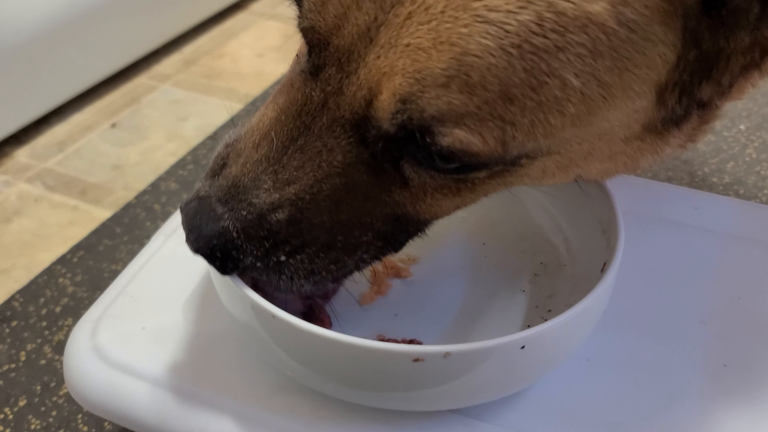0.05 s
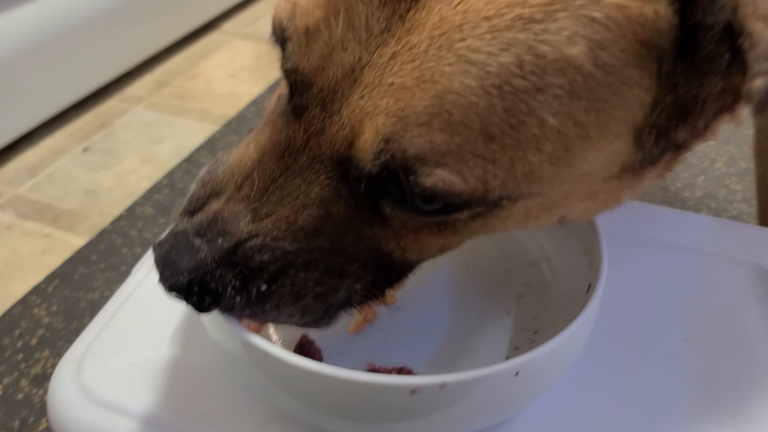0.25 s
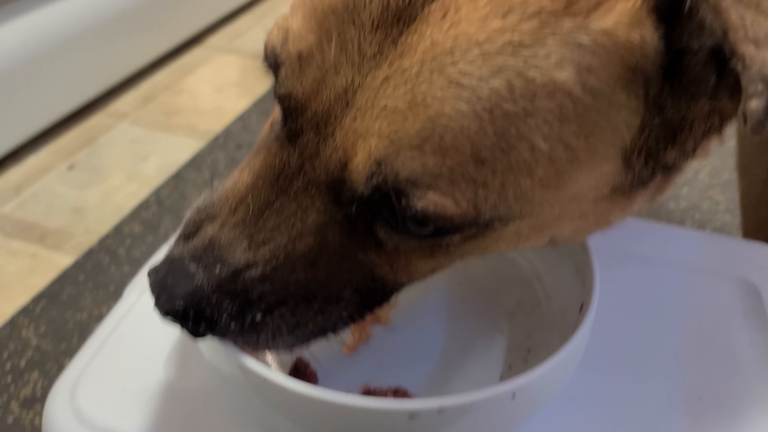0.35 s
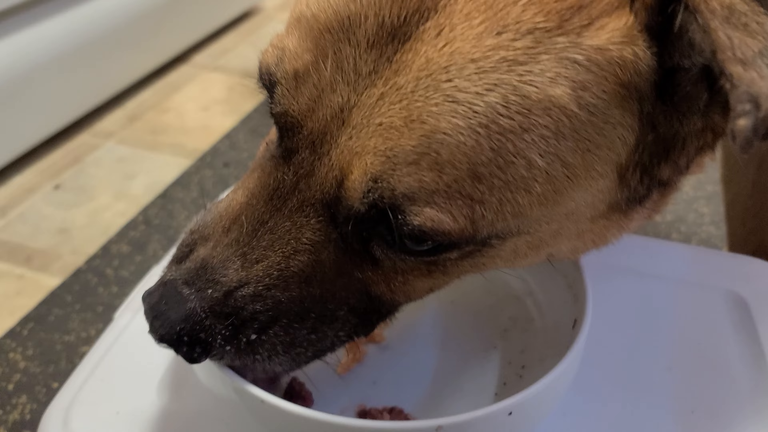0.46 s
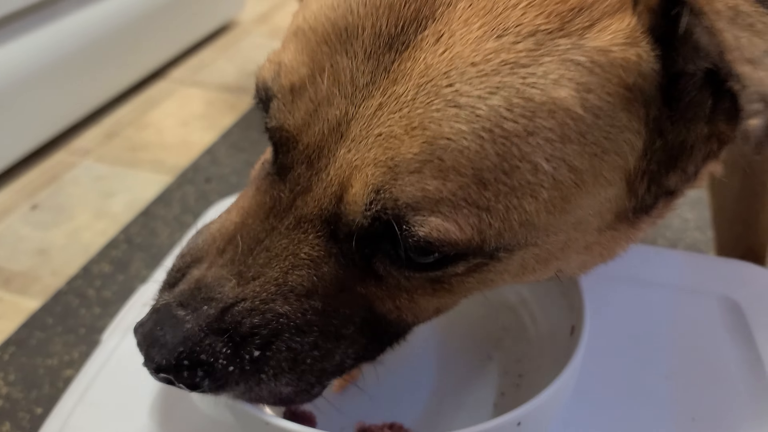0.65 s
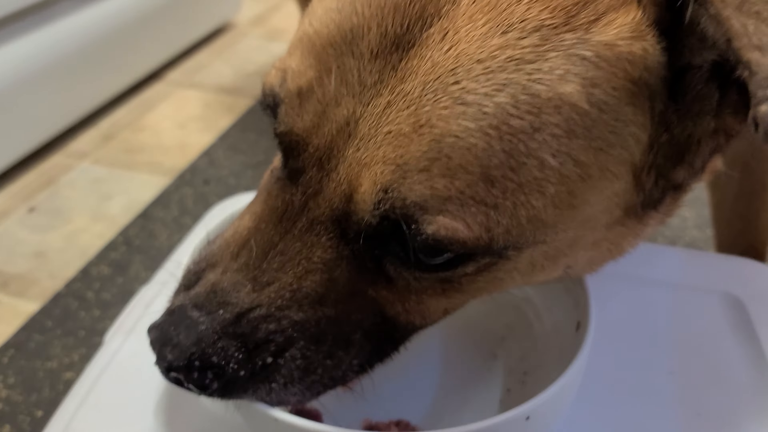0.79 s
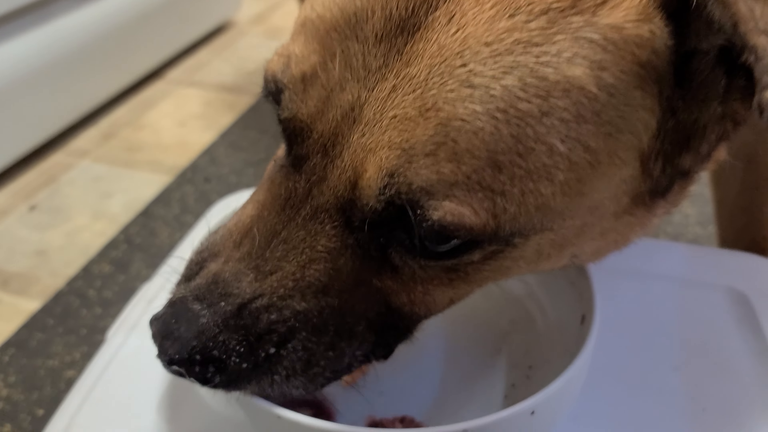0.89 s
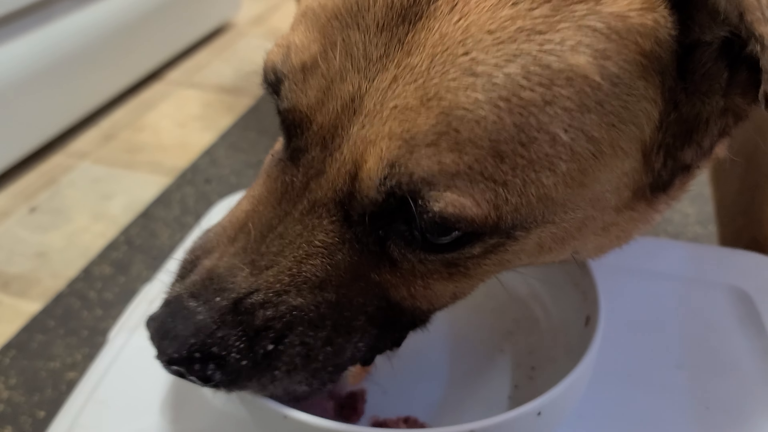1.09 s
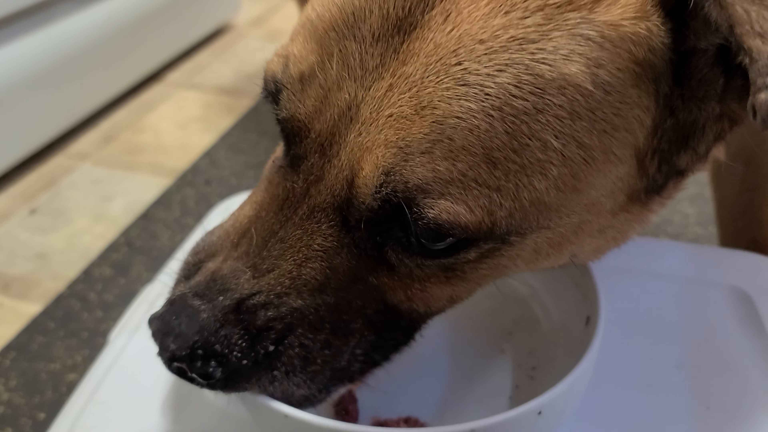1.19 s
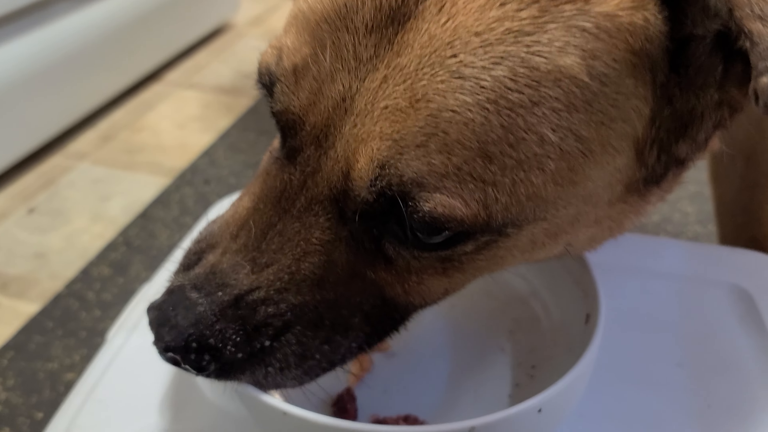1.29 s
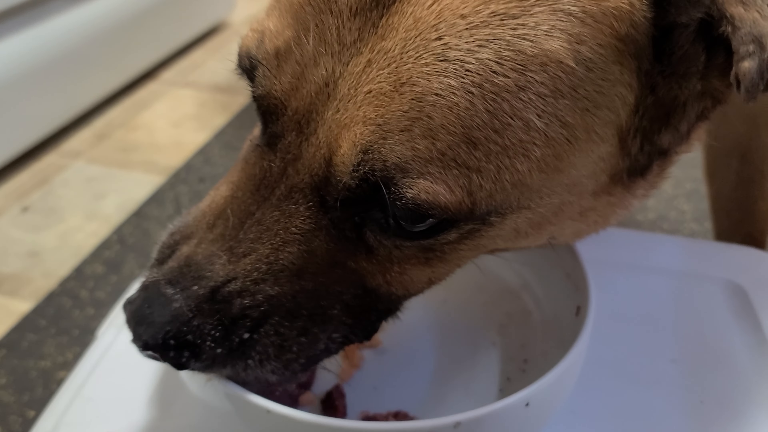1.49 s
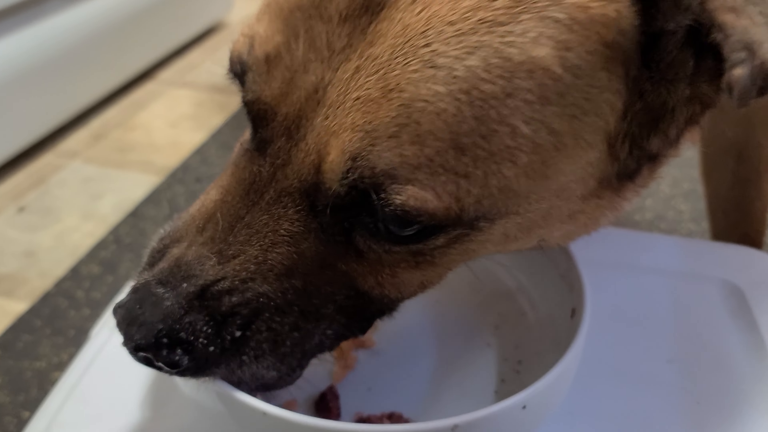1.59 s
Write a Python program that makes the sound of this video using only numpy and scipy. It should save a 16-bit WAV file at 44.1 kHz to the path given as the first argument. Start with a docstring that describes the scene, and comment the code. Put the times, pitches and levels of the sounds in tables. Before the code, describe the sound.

A dog eating from a ceramic bowl that knocks and judders on a hollow plastic stand, sniffing

```python
"""A dog noses meat out of a ceramic bowl on a hollow plastic stand, close to a phone in a kitchen.
From the start a quiet room hums and air hisses in the dog's nose, both shaped noise; shoves then
make bowl and stand judder (slips ringing damped modes), knock (decaying sines) and thud (blunt pushes).
From the middle on saliva ticks (noise puffs); near the end wet lips smack and the stand groans (gliding
and steady tones), a nostril whistles (wobbling tone), and a last knock falls. Tiles and cupboards reflect."""
import sys
import numpy as np
from scipy import signal
from scipy.fft import rfft, irfft
from scipy.io import wavfile
from scipy.ndimage import uniform_filter1d

SR = 44100
rng = np.random.default_rng(int(sys.argv[2]) if len(sys.argv) > 2 else 0)


def ratio(d):
    """dB to gain"""
    e = np.asarray(d, float) / 20
    return 10 ** e


def to_wav(sig):
    """Store sig (one row per channel, or 1-D mono) as 16-bit WAV at the path in sys.argv[1].

    Samples outside -1..1 are clipped; the rate is SR.
    """
    pcm = np.clip(np.atleast_2d(sig), -1, 1) * 32767
    pcm = np.round(pcm).astype(np.int16)
    wavfile.write(sys.argv[1], SR, pcm.T)  # frames by channels


N = 72765  # samples

# room hum: (frequency [Hz], relative level per Hz [dB])
HUM = [(25, 2), (62, 7), (300, -5.5), (1000, -11.5), (2200, -20.5), (10000, -19), (16000, -35)]
HUM_DB = -48
# likeness of left and right in the hisses: (frequency [Hz], likeness [0 to 1])
LIKENESS = [(100, .93), (1000, .6), (10000, .3)]

# air in the nose: (time [s], level of the nasal band [dB], level of the treble [dB])
NOSE = [(0, -50.5, -48), (.1, -38.5, -39), (.67, -38, -41), (.71, -35.5, -35), (.79, -42, -40),
        (.83, -45, -50.5), (1., -57.5, -54.5), (1.12, -50, -53), (1.16, -43, -36.5), (1.2, -44.5, -41.5),
        (1.3, -53, -57.5), (1.39, -51, -51.5), (1.42, -41, -42), (1.58, -44, -44.5), (1.65, -38, -33)]
# nostril resonances: (frequency [Hz], width [Hz], relative level [dB])
NOSTRILS = [(3150, 570, -1.5), (3950, 1230, -5), (4755, 193, -1.5), (5773, 460, -0.5)]
# colour of the treble fizz: (frequency [Hz], relative level per Hz [dB])
TREBLE = [(7000, -5.5), (8000, -5), (10000, -1.5), (16000, -2.5)]

# judder, one table per shove: (time [s], level of middle modes [dB], upper modes above it [dB])
SHOVES = [
    [(.04, -46.5, -3), (.14, -48.5, -20), (.23, -53.5, -30)],
    [(.243, -25.5, -4), (.255, -21.5, -0.5), (.303, -29, -8), (.315, -23, -2.5), (.35, -25.5, -8.5),
     (.39, -36, 3.5), (.425, -43.5, 5.5)],
    [(.462, -40.5, -12), (.495, -34.5, 3), (.53, -33.5, 4.5), (.565, -30.5, -1), (.59, -47, -16)],
    [(.682, -32.5, -2), (.692, -21.5, 2.5), (.735, -24.5, -11.5), (.785, -26.5, -3), (.808, -28.5, -7),
     (.85, -38.5, -19), (.9, -51, -9)],
    [(1.222, -37.5, 1), (1.272, -35.5, -8.5), (1.3, -49.5, -2)],
]
# modes of bowl and stand: (frequency [Hz], width [Hz], relative level [dB])
STAND = [(303, 31, -6), (411, 49.5, 7), (567, 109, 0.5), (643.3, 28.5, -1.5), (812, 71.4, 5.5),
         (869, 133, -1.5), (1222, 86, -0.5), (1447, 97, -3), (1813, 196, -1.5), (2118, 83, -3),
         (2277, 153, 1.5), (3150, 362, 6), (4040, 243, -2.5), (4930, 1130, 3), (5670, 300, -5.5)]
MIDDLE_FROM_HZ, UPPER_FROM_HZ = 520, 1600  # where the middle and the upper modes begin
LOW_DB = -5.5  # low modes against the middle ones
SOFT = 5  # each mode builds up this many times faster than it dies
SLIPS_PER_S, SLIP_SPREAD_DB = 1700, 3.
MODE_SPREAD_DB, WANDER_DB = 4., 4.  # unevenness of each slip, and drifting unevenness of the modes
BOOM_HZ, BOOM_WIDTH_HZ, BOOM_DB = 69.3, 6.5, -13.5  # the floor, against the judder

# kitchen reflections: level, decay time to -60 dB, silence before the first one
REFLECTIONS_DB, REFLECTIONS_T60_S, REFLECTIONS_GAP_S = -10.5, 0.18, 0.0033

# single knocks: (time [s], peak [dB], struck mode [Hz], hardness [dB])
KNOCKS = [(0.247, -4.5, 850, -2.5), (0.268, -9, 388, 0.5), (.289, -9.5, 840, -11), (.556, -14, 820, -7.5),
          (0.685, -7, 804, 4.5), (.812, -6, 601, -24), (0.838, -28, 1447, -25), (0.943, -26, 685, 1.5),
          (1.211, -21.5, 660, 5), (1.271, -30, 790, -20), (1.371, -28.5, 825, 10), (1.475, -8, 901, 1.5)]
KNOCK_OCTAVES = 0.13  # spread of low and middle modes rung around the struck one
HARD_DAMPING_HZ = 42  # extra mode width for a knock of 0 dB hardness
CONTACT_S, KNOCK_SPREAD_DB = .003, 3.  # soft onset; unevenness of the upper modes

# dull thuds, the foot of the bowl dropping back: (time [s], peak [dB])
THUDS = [(0.309, -10.5), (.329, -16), (.353, -15.5), (.510, -19.5), (.529, -12.5), (.710, -13.5),
         (.718, -13), (.760, -21), (.775, -13), (.781, -12), (.789, -15)]
THUD_HZ, THUD_WIDTH_HZ = 660, 330

# saliva ticks: (time [s], level before the decay [dB], centre frequency [Hz])
TICKS = [(.917, -37.5, 3600), (1.158, -36.5, 1280), (1.224, -26, 2450), (1.229, -29, 12800),
         (1.326, -38, 1614), (1.327, -35.5, 4450), (1.41, -39, 2580)]
TICK_OCTAVES, TICK_ATTACK_S = 0.6, 0.00021
TICK_DECAY_S = .009  # time to fall by 20 dB

# wet lips closing: the resonance falls from the first frequency to the second
SMACK_S, SMACK_LENGTH_S, SMACK_HZ, SMACK_END_HZ = 1.226, .085, 2500, 1550
SMACK_DB = -38  # ahead of crackle and fade

# the stand hums once on its low mode
GROAN_S, GROAN_LENGTH_S, GROAN_HZ, GROAN_PEAK_DB = 1.228, 0.0321, 422.6, -19.5

# nostril whistle: (time [s], frequency before the wobble [Hz], peak level [dB])
WHISTLE = [(1.335, 3150, -48), (1.37, 3390, -36.5), (1.415, 3370, -55)]

# balance of the two microphone ports: (frequency [Hz], left minus right [dB])
PORT_BALANCE = [(300, -0.5), (1500, -2), (5000, -11), (14000, -3.5)]
LEAD_RAD, LEAD_HZ = 1.66, 1350  # the left port's phase lead far above LEAD_HZ; half of it there
EDGE_HZ = 15900  # upper band limit


def evened(x):
    """Scale to rms 1."""
    return x / np.sqrt(np.mean(x ** 2) + 1e-20)


def read(points, hz):
    """Spectrum table on a log-frequency axis."""
    f, value = np.transpose(points)
    return np.interp(np.log(hz + 1), np.log(f + 1), value)


def curve(rows, column, silent=None):
    """One column of a table at every sample; silent is its value outside the table."""
    rows = np.array(rows)
    return np.interp(np.arange(N) / SR, rows[:, 0], rows[:, column], silent, silent)


def ring(x, hz, width):
    """One damped mode struck by x: a two-pole resonator."""
    radius = np.exp(-np.pi * width / SR)
    angle = 2 * np.pi * hz / SR
    return signal.lfilter([0, np.sin(angle)], [1, -2 * radius * np.cos(angle), radius ** 2], x)


def hiss(gain, patchy_db):
    """Two-channel noise of rms 1 with drifting patches, coloured by gain(hz)."""
    frames, hz = N // 128 + 5, np.fft.rfftfreq(512, 1 / SR)
    a, b, c, d, patches = rng.standard_normal((frames, 257, 5)).T
    patches = uniform_filter1d(patches, size=5, axis=0)  # across frequency
    patches = evened(uniform_filter1d(patches, size=14, axis=1))  # along time
    same = np.clip(read(LIKENESS, hz), -1, 1)[:, None]
    left = a + 1j * b
    right = same * left + np.sqrt(1 - same ** 2) * (c + 1j * d)
    spectra = np.array([left, right]) * ratio(patchy_db * patches)
    noise = signal.istft(spectra, nperseg=512, noverlap=384)[1][:, :N]
    return evened(irfft(rfft(noise) * gain(np.fft.rfftfreq(N, 1 / SR)), N))


def room_hum():
    """Steady noise of the quiet kitchen, strongest in the bass."""
    return ratio(HUM_DB) * hiss(lambda hz: ratio(read(HUM, hz)), patchy_db=-0.5)


def nostrils(hz):
    """Gain of the nostril resonances, steep on their flanks."""
    return sum(ratio(db) / (1 + abs(2 * (hz - f) / width) ** 3) for f, width, db in NOSTRILS)


def nose():
    """Turbulent air in the nostrils: a nasal band and a treble fizz."""
    nasal = ratio(curve(NOSE, 1)) * hiss(nostrils, patchy_db=1.2)
    fizz = ratio(curve(NOSE, 2)) * hiss(lambda hz: ratio(read(TREBLE, hz)), patchy_db=3.5)
    return nasal + fizz


def judder():
    """Uneven slips of the bowl's foot ring every mode by a different, wandering amount."""
    level, hard = (sum(ratio(curve(shove, column, -120)) for shove in SHOVES) for column in (1, 2))
    strength = ratio(SLIP_SPREAD_DB * np.minimum(rng.exponential(1, N), 3))
    slips = strength * (rng.random(N) < SLIPS_PER_S / SR)
    groups = np.zeros((3, 2, N))  # low, middle and upper modes, in two channels
    for hz, width, db in STAND:
        *own, slow = rng.standard_normal((3, N))  # each slip reaches the two sides unevenly
        wander = evened(uniform_filter1d(slow, size=700))
        share = ratio(db + MODE_SPREAD_DB * np.array(own) + WANDER_DB * wander)
        strikes = slips * share * rng.choice([-1., 1.], N)
        mode = ring(ring(strikes, hz, width), hz, SOFT * width)
        groups[int(hz > MIDDLE_FROM_HZ) + int(hz > UPPER_FROM_HZ)] += width * mode
    low, middle, upper = (evened(group) for group in groups)
    boom = ratio(BOOM_DB) * evened(ring(rng.standard_normal(N), BOOM_HZ, BOOM_WIDTH_HZ))
    shaken = level * (ratio(LOW_DB) * low + middle + hard * upper)
    return shaken + uniform_filter1d(level, size=1500) * boom  # the boom follows more smoothly


def reflections(x):
    """Sparse reflections from tiles and cupboards, other ones per channel."""
    t = np.arange(SR // 4) / SR
    draw = rng.standard_normal((2, len(t)))
    taps = np.sign(draw) * (abs(draw) > 2)
    taps *= ratio(-60 * t / REFLECTIONS_T60_S) * np.clip(t / REFLECTIONS_GAP_S - 1, 0, 1)
    return signal.fftconvolve(x[None], taps / np.linalg.norm(taps[0]), axes=1)[:, :N]


def knocks():
    """Each knock rings the modes near its pitch, and the upper modes by its hardness."""
    out, t = np.zeros(N), np.arange(4000) / SR
    spreads = rng.standard_normal((len(KNOCKS), len(STAND)))
    for (s, peak_db, struck_hz, hard_db), spread in zip(KNOCKS, spreads):
        sound = np.zeros(len(t))
        for (hz, width, db), u in zip(STAND, spread):
            if hz > UPPER_FROM_HZ:
                gain = ratio(db + hard_db + KNOCK_SPREAD_DB * u)
            else:
                gain = np.exp(-(np.log2(hz / struck_hz) / KNOCK_OCTAVES) ** 2)
            decay = np.exp(-np.pi * (width + HARD_DAMPING_HZ * ratio(hard_db)) * t)
            sound += gain * decay * np.sin(2 * np.pi * hz * t)
        sound *= np.sin(np.pi / 2 * np.minimum(t / CONTACT_S, 1)) ** 2
        part = out[round(s * SR):][:len(t)]
        part += (ratio(peak_db) * sound / abs(sound).max())[:len(part)]
    return out


def thuds():
    """Blunt pushes that die within two or three cycles."""
    pushes = np.zeros(N)
    for (s, peak_db), u in zip(THUDS, rng.standard_normal(len(THUDS))):
        pushes[round(s * SR)] = ratio(peak_db) * np.sign(u)
    both = [pushes, signal.unit_impulse(N)]  # the unit push gives the peak to scale by
    rung = ring(ring(both, THUD_HZ, THUD_WIDTH_HZ), THUD_HZ, THUD_WIDTH_HZ)
    sound, unit = np.gradient(rung, axis=1)
    return sound / abs(unit).max()


def ticks():
    """Short puffs of noise where a thread of saliva snaps."""
    out, t = np.zeros(N), np.arange(2048) / SR
    hz = np.fft.rfftfreq(len(t), 1 / SR) + 1
    noises = rng.standard_normal((len(TICKS), len(t)))
    for (s, level_db, centre_hz), noise in zip(TICKS, noises):
        band = irfft(rfft(noise) * np.exp(-(np.log2(hz / centre_hz) / TICK_OCTAVES) ** 2))
        envelope = ratio(level_db - 20 * t / TICK_DECAY_S) * np.minimum(t / TICK_ATTACK_S, 1)
        part = out[round(s * SR):][:len(t)]
        part += (envelope * evened(band))[:len(part)]
    return out


def smack():
    """Wet crackle in a mouth resonance that falls as the lips close."""
    u = np.clip((np.arange(N) / SR - SMACK_S) / SMACK_LENGTH_S, 0, 1)
    hz = SMACK_END_HZ + (SMACK_HZ - SMACK_END_HZ) * (1 - u) ** 2
    wet = 1 + evened(uniform_filter1d(rng.standard_normal(N), size=110))
    tone = np.sin(2 * np.pi * np.cumsum(hz) / SR)
    return ratio(SMACK_DB) * (u > 0) * (1 - u) * wet * tone


def groan():
    """A swelling and fading low tone of the stand."""
    u = np.clip((np.arange(N) / SR - GROAN_S) / GROAN_LENGTH_S, 0, 1)
    phase = 2 * np.pi * GROAN_HZ * GROAN_LENGTH_S * u
    return ratio(GROAN_PEAK_DB) * np.sin(np.pi * u) * np.sin(phase)


def whistle():
    """A thin whistle in one nostril, its pitch wobbling by about one percent."""
    wobble = 1 + 0.00996 * evened(uniform_filter1d(rng.standard_normal(N), 120))
    phase = 2 * np.pi * np.cumsum(curve(WHISTLE, 1) * wobble) / SR
    return ratio(curve(WHISTLE, 2, -120)) * np.sin(phase)


def scene():
    """Bowl, mouth and nose near the phone, over the room."""
    shake = judder()
    near = knocks() + thuds() + ticks() + smack() + groan() + whistle()
    reflected = ratio(REFLECTIONS_DB) * reflections(near + shake.mean(0))
    return room_hum() + nose() + shake + near + reflected


def low_pass(x):
    """Removes everything above the highest recorded frequency."""
    return signal.sosfilt(signal.butter(12, 16910, fs=SR, output="sos"), x)


def record(dry):
    """Two microphone ports differ in level and phase by frequency, below a sharp band limit."""
    hz = np.fft.rfftfreq(N, 1 / SR)
    lead = LEAD_RAD * hz ** 2 / (hz ** 2 + LEAD_HZ ** 2)
    tilt = ratio(read(PORT_BALANCE, hz) / 2) * np.exp(.5j * lead)  # half to each port
    ports = np.array([tilt, 1 / tilt])
    ports *= (hz < EDGE_HZ) / np.sqrt((abs(ports) ** 2).mean(0))  # keep the mean power
    mix = irfft(rfft(dry) * ports, N)
    return low_pass(mix)


dry = scene()
out = record(dry)
to_wav(out)
```